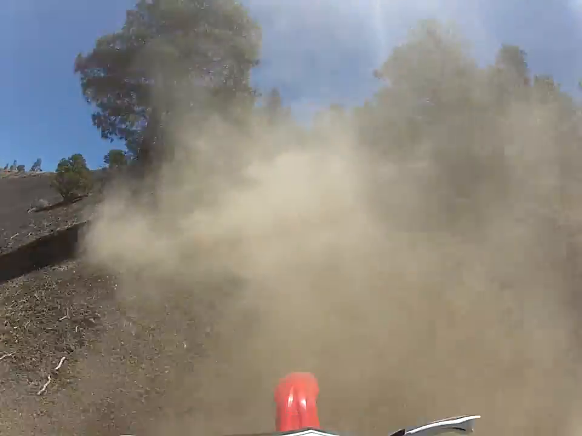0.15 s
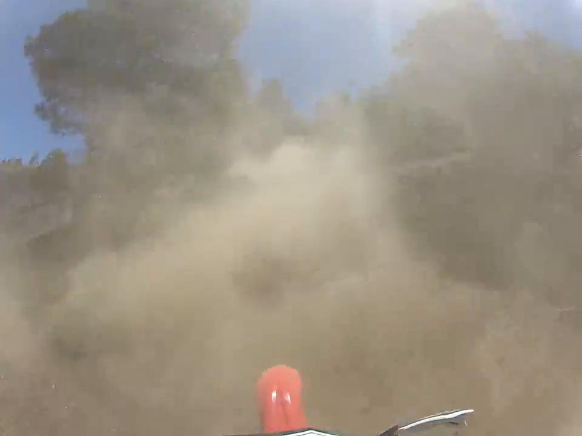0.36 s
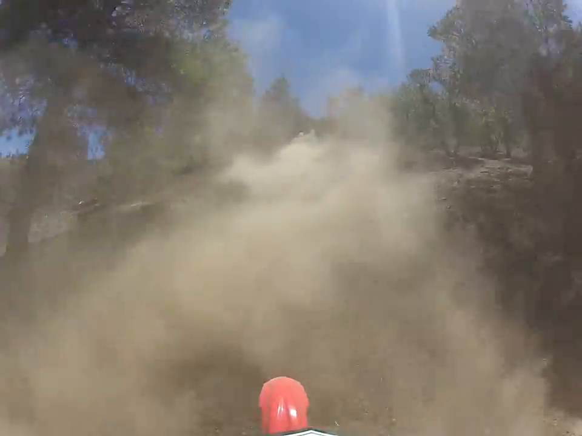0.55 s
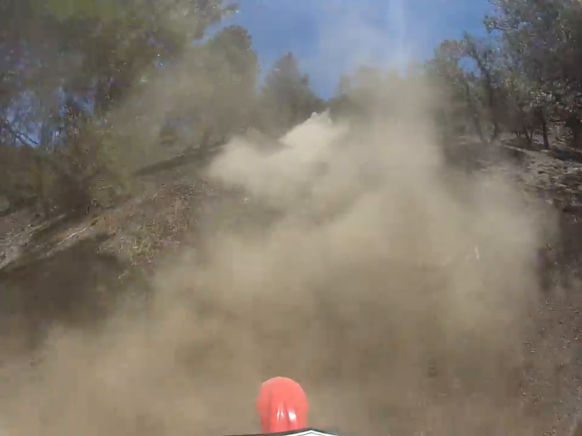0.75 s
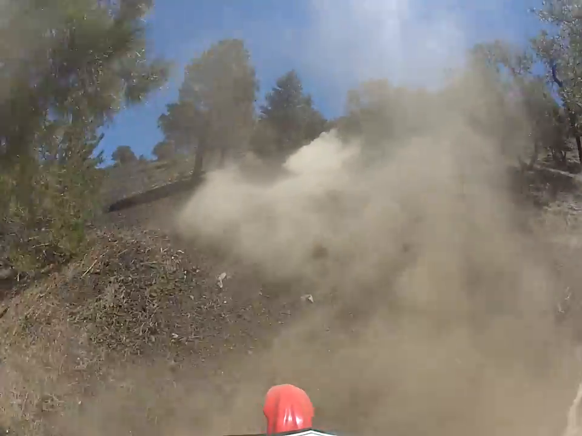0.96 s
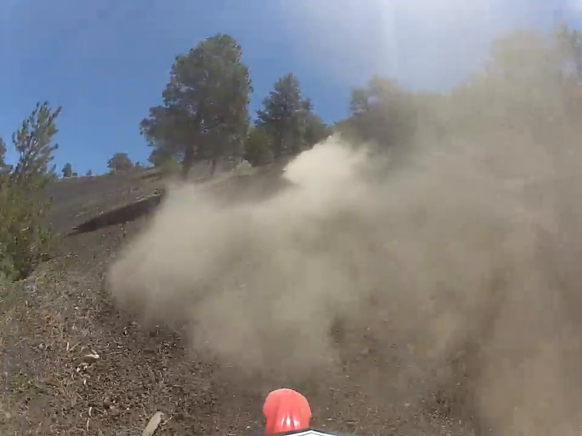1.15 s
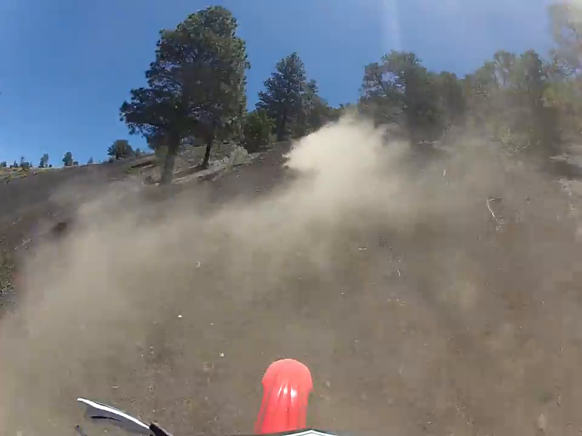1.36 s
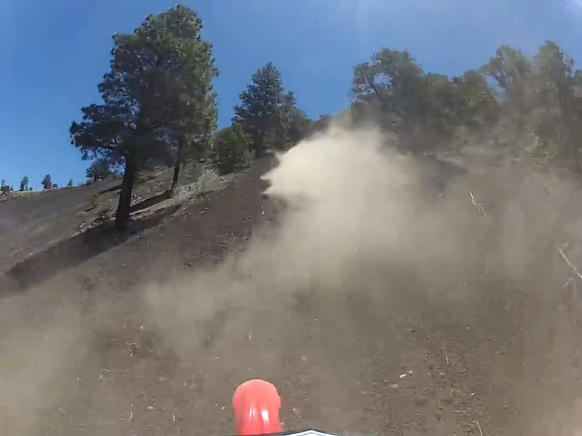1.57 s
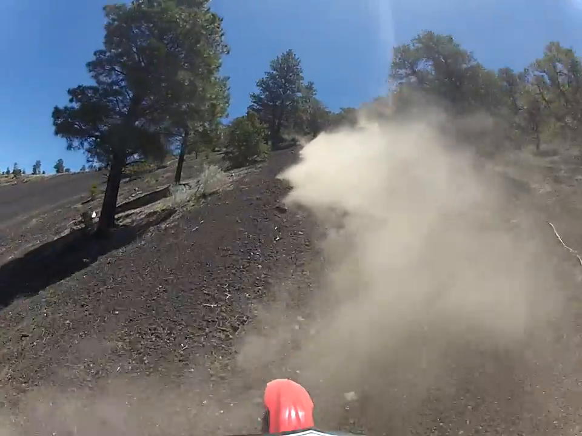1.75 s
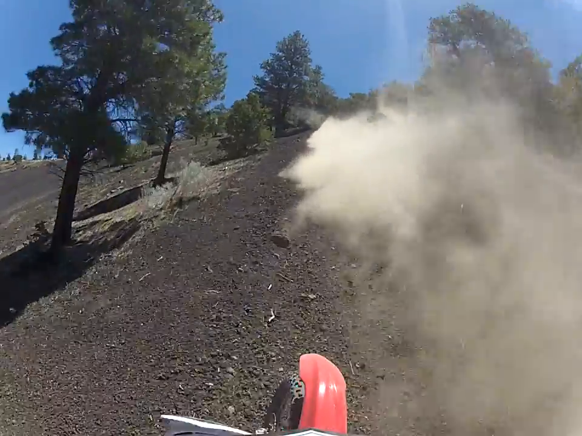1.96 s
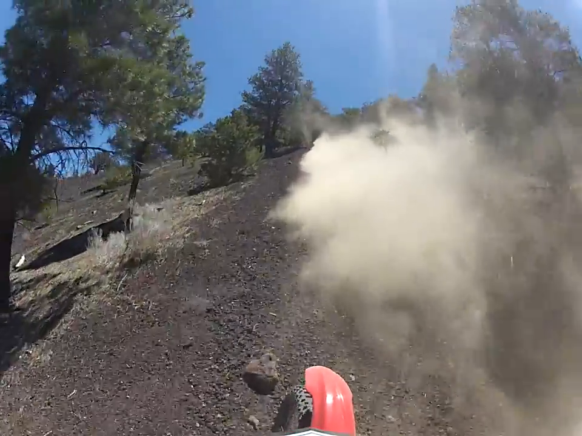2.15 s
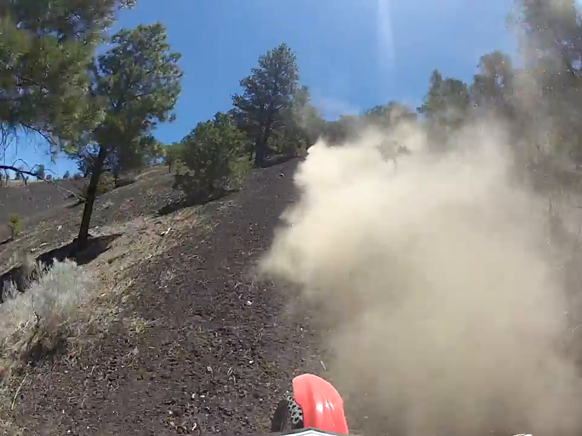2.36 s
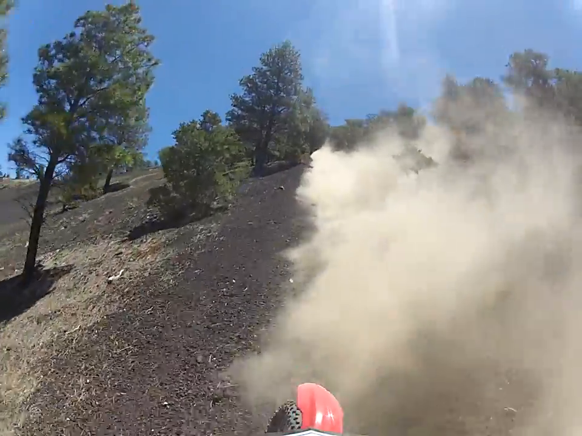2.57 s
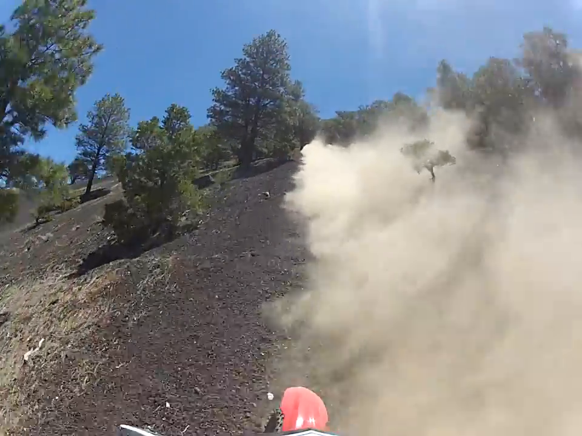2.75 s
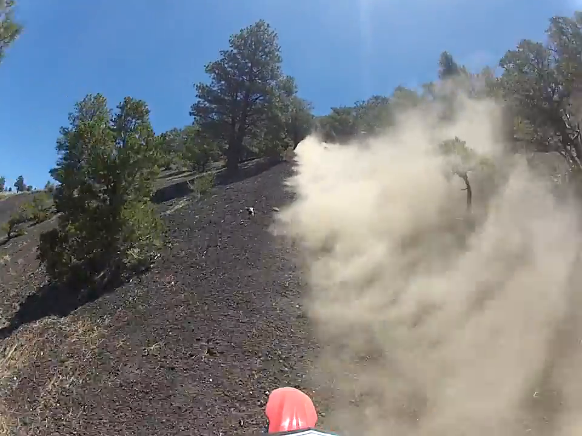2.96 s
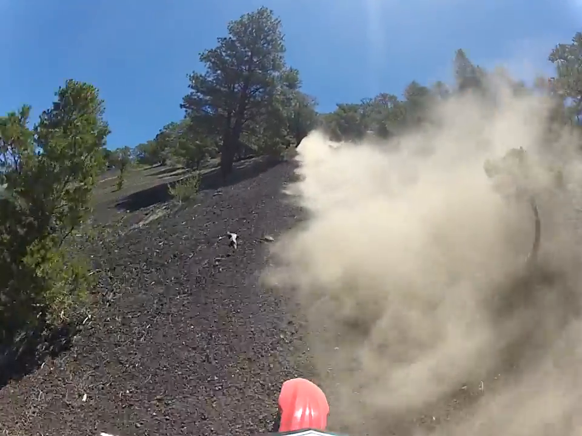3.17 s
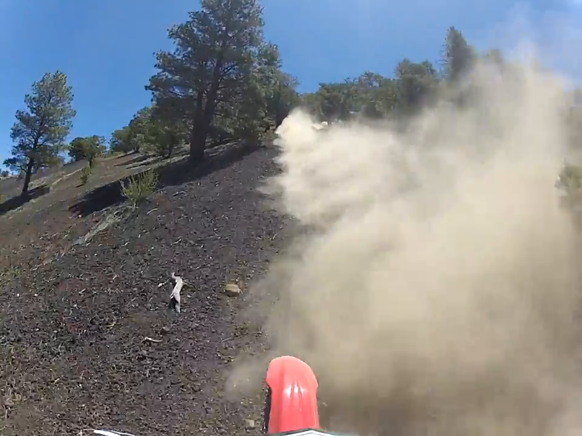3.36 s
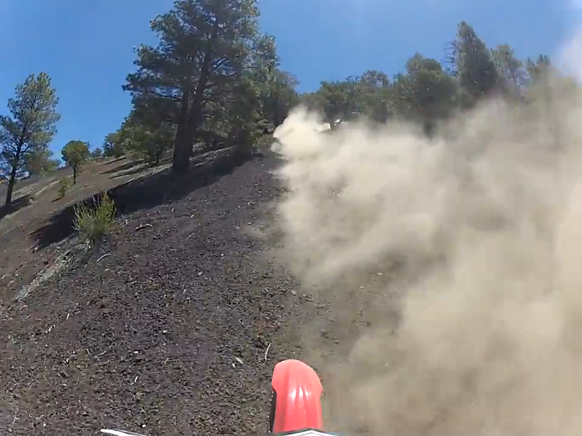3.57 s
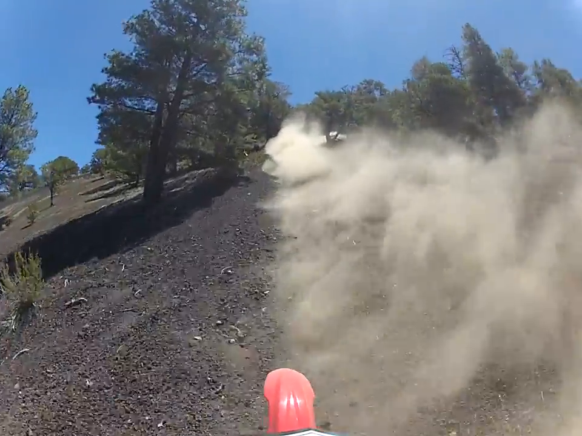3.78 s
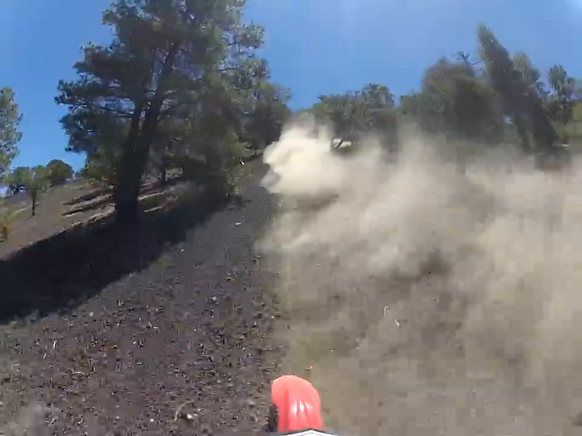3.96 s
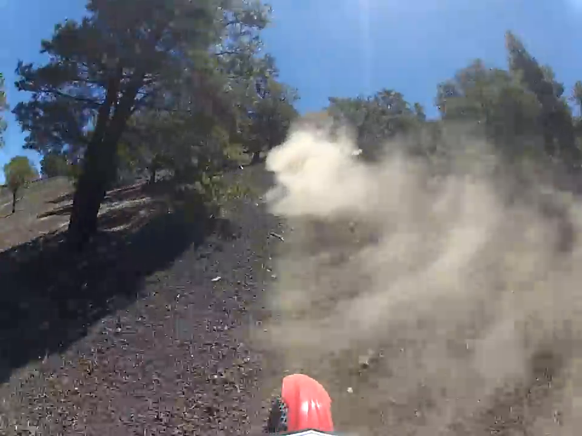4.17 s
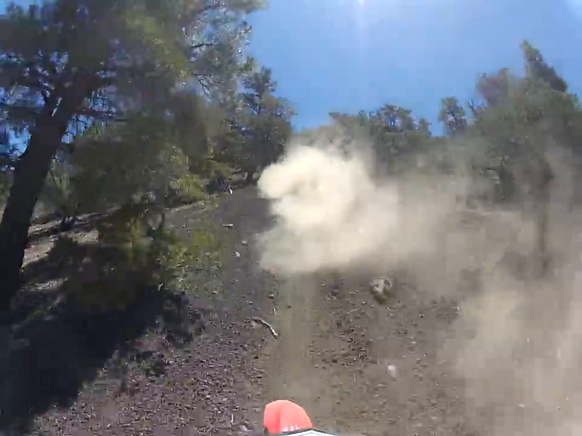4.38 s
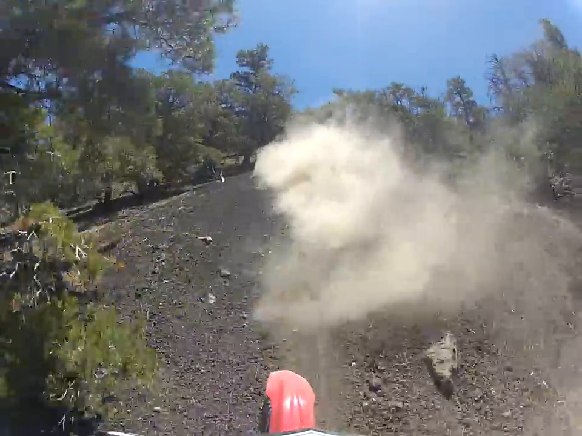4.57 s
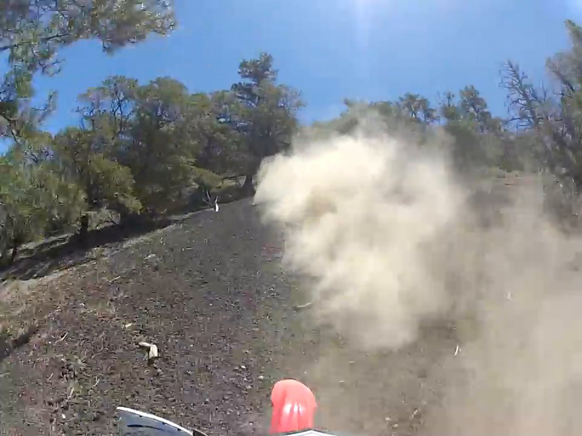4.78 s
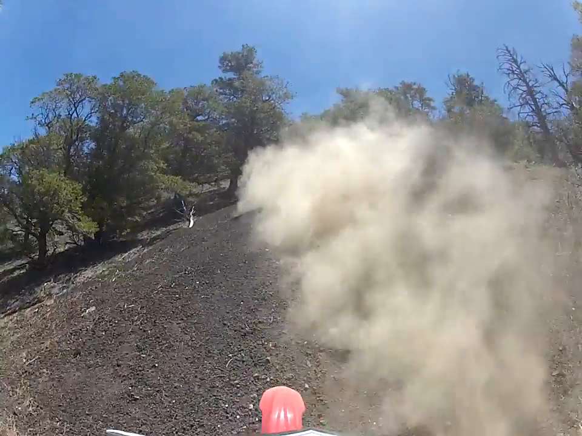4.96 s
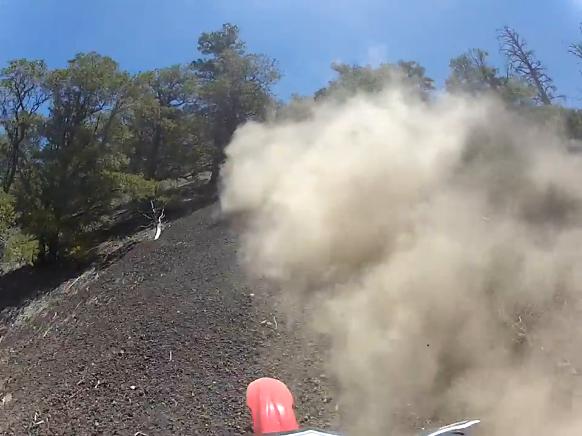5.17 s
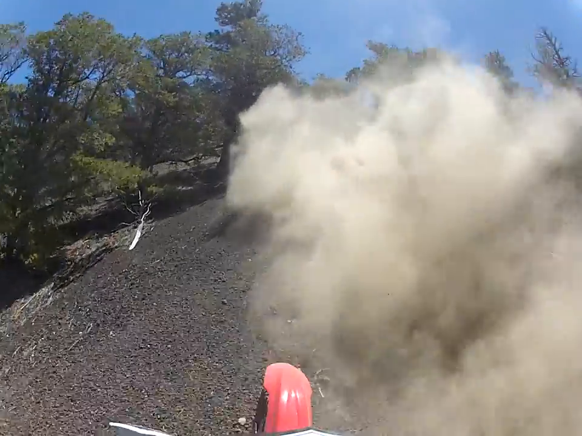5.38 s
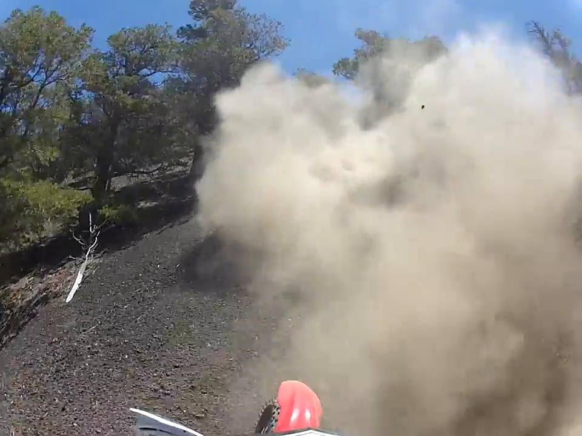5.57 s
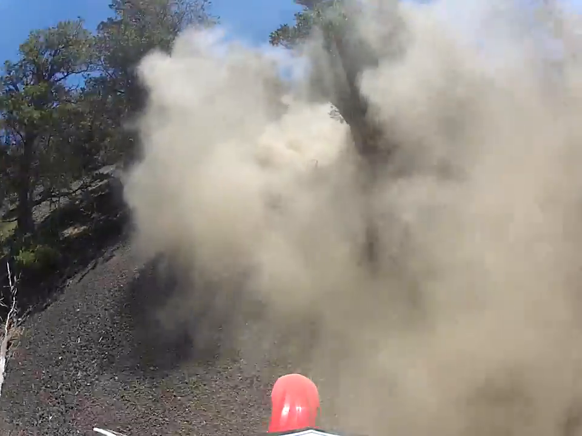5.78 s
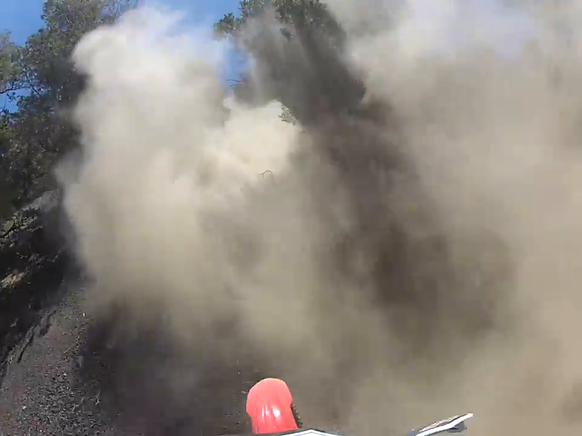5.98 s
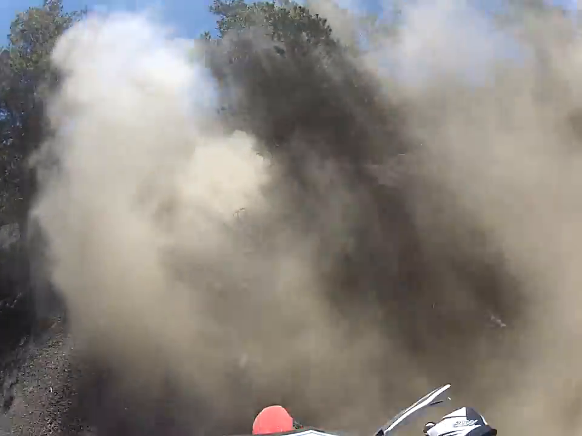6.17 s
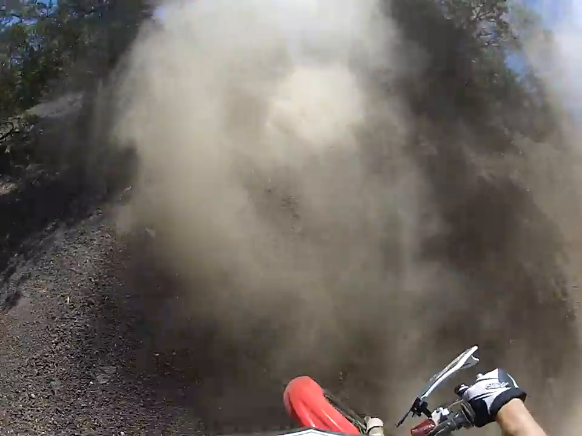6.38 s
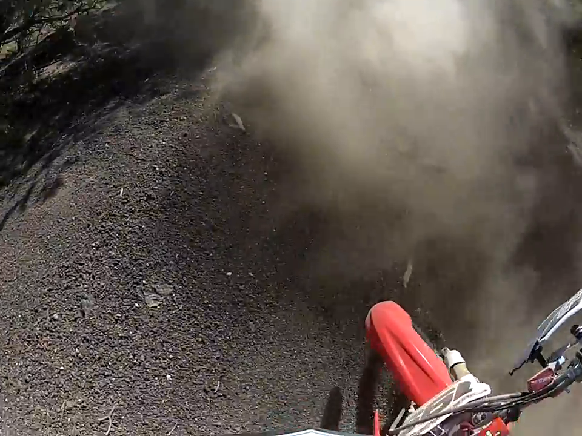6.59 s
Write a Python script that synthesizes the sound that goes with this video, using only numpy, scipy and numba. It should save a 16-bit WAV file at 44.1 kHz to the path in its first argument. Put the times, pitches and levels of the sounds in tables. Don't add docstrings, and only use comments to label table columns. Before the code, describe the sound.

A single-cylinder dirt bike roars steadily up a loose slope, crackling harshly, then shuts off, blips once and sags to faint idle with knocks.

```python
import sys
import numpy as np
from scipy import signal
from scipy.io import wavfile
from scipy.ndimage import uniform_filter1d
from numba import njit

SR = 44100
rng = np.random.default_rng(int(sys.argv[2]) if len(sys.argv) > 2 else 0)


def boost(x):
    u = np.asarray(x, float) / 20
    return 10 ** u


def digitize_waveform(pressure):
    field = np.atleast_2d(pressure).T
    bounded = np.clip(field, -1, 1)
    quanta = np.round(bounded * 32767).astype(np.int16)
    wavfile.write(sys.argv[1], SR, quanta)


N = 292383

# time_s, firing_rate_hz
FIRING_RATE = [(0, 54.635), (.26, 50.249), (.58, 58.422), (.96, 63.33), (1.4, 60.936), (1.68, 59.668),
               (1.8, 51.84), (2.5, 55.513), (2.95, 61.449), (3.5, 60.032), (4, 60.018), (4.52, 60.97),
               (4.76, 50.565), (4.8, 50.6), (5.038, 31.71), (5.698, 36.62), (6.05, 22.5), (6.63, 25)]
# time_s, level_db, load (0-1)
THROTTLE = [(0, -21, 0.78), (.38, -19.5, 0.77), (.63, -18.5, 0.35), (.7, -20, 0), (1.45, -19.5, 0.05),
            (1.66, -20.5, 0.26), (1.78, -23, 0.83), (2.1, -20.5, 0.75), (2.45, -20.5, 0.87),
            (2.83, -17, 0.57), (2.88, -20.5, 0), (4.45, -18.5, 0), (4.62, -20.5, 0.88), (5.19, -22.5, 0.6),
            (5.44, -31.5, 0.93), (5.8, -31, 0.35), (5.95, -35.5, 0), (6.63, -46.5, 0.4)]
# time_s, extra_db
BARKS = [(.353, 11.5), (.392, 6), (.518, 4.5), (.688, 11), (.788, 2), (.821, 9), (.918, 1.5), (1.093, 3),
         (1.188, 8.5), (1.481, 6), (1.582, 5), (1.615, 6.5), (1.734, 4.5), (2.843, 6), (2.877, 3),
         (2.943, 5), (3.072, 7), (3.171, 5), (3.352, 4.5), (3.635, 2), (3.986, 9.5), (4.019, 1.5),
         (4.282, 2.5), (4.399, 4.5), (5.099, 2.5), (5.181, 6), (5.419, 10), (5.756, 2), (5.785, 8),
         (5.847, 7)]
# mode_hz, width_hz, cruising_db, full_load_db, polarity (signed factor)
PIPE_MODES = [(99.5, 50, -29.5, -13, 1), (169, 48, -20, -21.5, -0.61), (222.2, 40.4, 8.5, 2, -0.81),
              (277, 44.6, -7.5, 1, 0.83), (312, 34.5, -17.5, -1.5, -1.09), (375, 160, -22.5, -66, 1),
              (457.8, 38.6, -7, -8, -0.9), (641, 76, -13, -20, 0.77), (740, 54, -17.5, -11, -0.76),
              (996, 50.3, -4.5, -7.5, 0.66), (1250, 76, -4.5, 0.5, -0.47)]
# mode_hz, width_hz, level_db
COOL_PIPE_MODES = [(71, 20, -10.5), (149, 25, -2.5), (178, 25, 2), (208, 23, 1), (304, 60, -3),
                   (404, 40, -8.5), (505, 54, -15), (625, 85, -15.5)]
# mode_hz, width_hz, gas_crack_db, clatter_db
CASE_MODES = [(309, 194, -38, -11.5), (547, 320, -47, -11.5), (839, 270, -9, -4), (981, 190, -11, -3.5),
              (1245, 175, -5, -2.5), (1660, 223, -10, -9), (1924, 106, -4.5, 6), (2280, 251, -1.5, -7),
              (2431, 134, -15.5, 1), (2900, 200, -17, -14), (3460, 270, -12, -9), (4260, 5500, -20.5, -29),
              (5930, 500, -23.5, -68)]
# centre_hz, width_hz, spread (ratio)
FLARES = [(1980, 260, .33), (2400, 260, .33), (2900, 400, .6), (3900, 500, .75), (4650, 500, .75)]
# order (multiple of the firing rate), level_db
SHAKE_ORDERS = [(1, -13), (2, -15.5), (3, -5.5), (4, 7.5), (5, -5), (6, -1), (8, -5.5)]
# start_s, length_s, depth_db
LIFTS = [
    (0.093, 0.21, -2),
    (1.698, 0.17, -2),
    (4.884, 0.218, -12.5),
    (5.193, 2, -8.5),
]
# time_s, over_steady_wind_db
GUSTS = [(0, 5), (.55, 7.5), (1.7, 6), (2.2, -11), (2.47, 7), (2.79, 1), (3.55, 3), (4.51, 5), (4.95, 7.5),
         (5.2, 7), (5.47, 3), (5.74, -5), (5.87, 5)]
# start_s, peak_db, ring_hz, tick_over_ring_db
KNOCKS = [(5.421, -41, 3400, -4), (5.598, -45, 5100, -8), (5.884, -41, 3600, 2), (5.917, -41, 4000, -2),
          (6.16, -34, 54, -26), (6.213, -29, 40, -16), (6.27, -31, 40, -24), (6.393, -34.5, 1250, -5.5),
          (6.425, -25.5, 80, -23), (6.43, -34, 510, -20), (6.45, -47, 450, -17), (6.47, -25.5, 35, -25),
          (6.576, -35, 350, -4), (6.616, -33.5, 150, -4)]

FIRST_PHASE = .57
CAMERA_RATE_HZ = 12000


def curve(table):
    s, *columns = np.transpose(table)
    return [np.interp(np.arange(N) / SR, s, c) for c in columns]


def unit(x):
    return x / np.sqrt(np.mean(x ** 2))


def ring(x, hz, width_hz):
    return signal.lfilter(*signal.iirpeak(hz, hz / width_hz, fs=SR), x)


def walk(rate_hz):
    hold = int(SR / rate_hz)
    levels = rng.standard_normal(N // hold + 1)
    return unit(uniform_filter1d(np.repeat(levels, hold)[:N], hold))


def revs():
    blip_s, rise_s, fall_s, blip_hz = 5.132, .112, .219, 17.06
    t = np.arange(N) / SR - blip_s
    blip = np.clip(np.minimum(1 + t / rise_s, 1 - t / fall_s), 0, 1)
    return curve(FIRING_RATE)[0] + blip_hz * blip


def cycles():
    return FIRST_PHASE + np.cumsum(revs()) / SR


def lift():
    t, edge_s = np.arange(N) / SR, .02
    total_db = 0
    for start_s, length_s, depth_db in LIFTS:
        total_db += depth_db * np.clip(np.minimum(t - start_s, start_s + length_s - t) / edge_s, 0, 1)
    return total_db


def firings():
    cycle = np.floor(cycles()).astype(int)
    start = np.r_[0, np.flatnonzero(np.diff(cycle)) + 1] / SR
    strength_chance, timing_chance = rng.standard_normal((len(start), 2)).T
    strength_db = 1.2 * strength_chance
    for s, extra_db in BARKS:
        strength_db[np.argmin(abs(start - s))] = extra_db
    late_s = 0.00027 * timing_chance
    return cycle, np.arange(N) / SR - (start + late_s)[cycle], strength_db


def pipe(load):
    scatter_db = .7 + .2 * np.maximum(50 - revs(), 0)
    lead = 0.249
    angle = (cycles() + lead + .5) % 1 - .5
    pulses = np.exp(-(angle / 0.0085) ** 2) * boost(scatter_db * walk(70))
    cooling_s = .25
    cool = np.clip((np.arange(N) / SR - LIFTS[-1][0]) / cooling_s, 0, 1)
    hot_pulses, cool_pulses = (1 - cool) * pulses, cool * pulses
    total = np.zeros(N)
    for hz, width_hz, cruising_db, full_load_db, polarity in PIPE_MODES:
        mode = ring(ring(hot_pulses, hz, 3 * width_hz), hz, width_hz)
        total += polarity * boost(cruising_db + load * (full_load_db - cruising_db)) * mode
    for k, (hz, width_hz, db) in enumerate(COOL_PIPE_MODES):
        mode = ring(ring(cool_pulses, hz, 3 * width_hz), hz, width_hz)
        total += (-1) ** k * boost(db) * mode
    return unit(total)


def turbulence():
    return boost(2 * walk(40)) * unit(ring(rng.standard_normal(N), 268, 120))


def case(gas, clatter):
    total = 0
    for k, (hz, width_hz, gas_db, clatter_db) in enumerate(CASE_MODES):
        drive = boost(gas_db) * gas + boost(clatter_db) * clatter
        total = total + (-1) ** k * ring(ring(drive, hz, 4 * width_hz), hz, width_hz)
    return unit(total)


def crack(cycle, since, strength_db, clatter_db):
    t = np.maximum(since + 0.0011, 0)
    size = boost(strength_db[cycle])
    snap_t = since - .0006
    snap = np.sinc(snap_t * CAMERA_RATE_HZ) * np.exp(-(snap_t / 0.00037) ** 2)
    burst = (t / 0.0042) ** 2 * np.exp(-t / 0.0014)
    echo = 0.15 * np.exp(-((t - .0075) / 0.00014) ** 2)
    tail = 0.48 * np.exp(-t / 0.0078) * (t > 0)
    rush = unit(burst * size + echo + tail) * rng.standard_normal(N)
    snap_share = .4
    gas = np.sqrt(snap_share) * unit(ring(snap * size, 2203, 1040)) + np.sqrt(1 - snap_share) * rush
    chances = rng.standard_normal((cycle[-1] + 1, len(FLARES))).T
    flared = gas
    for chance, (hz, width_hz, spread) in zip(chances, FLARES):
        flared = flared + ring(spread * chance[cycle] * gas, hz, width_hz)
    clatter = boost(clatter_db + 2.0 * walk(60)) * rng.standard_normal(N)
    return case(unit(flared), clatter)


def shake():
    angle = 2 * np.pi * cycles()
    wander_db, wander_rad, spread_rad = 1.4, .15, -2.4
    hum = np.zeros(N)
    for k, db in SHAKE_ORDERS:
        level = boost(db + wander_db * walk(25))
        phase = k * angle + wander_rad * walk(30) - 1.03 * k + spread_rad * (k - 4) ** 2
        hum += level * np.sin(phase)
    return unit(hum + 2.6 * ring(hum, 170, 160))


def wind():
    deep, mid, side = rng.standard_normal((3, N))
    t, gust_s = np.arange(N) / SR, 0.065
    swell_db = sum(db * np.exp(-((t - s) / gust_s) ** 2) for s, db in GUSTS)
    gust = boost(-39 + swell_db - 2.0 + 0.51 * walk(9.5))
    buffet = boost(-9 + 2.5 * walk(3)) * unit(ring(deep, 37, 48))
    rumble = unit(ring(ring(mid, 84, 166), 72, 100)) + buffet
    unlike = boost(-10) * unit(ring(ring(side, 29, 41), 28, 27))
    return unit(rumble) * gust, unlike * gust


def knocks():
    thud, tick = np.zeros(N), np.zeros(N)
    for s, peak_db, hz, tick_db in KNOCKS:
        t = np.maximum(np.arange(N) / SR - s, 0)
        thud += boost(peak_db) * np.sin(2 * np.pi * hz * t) * np.exp(-t / (.005 + .65 / hz))
        tick += boost(peak_db + tick_db) * (t > 0) * np.exp(-t / 0.0089)
    return thud + tick * case(0, rng.standard_normal(N))


def burble():
    start_s, length_s, edge_s, height_db = 5.46, 0.29, 0.047, 4
    t = np.arange(N) / SR - start_s
    return height_db * np.clip(np.minimum(t, length_s - t) / edge_s, 0, 1)


def scene():
    level_db, load = curve(THROTTLE)
    lift_db, burble_db = lift(), burble()
    change_db = level_db - level_db.max()
    exhaust_db = burble_db + level_db + 6 * load + 1.15 * lift_db - 1.5
    crack_db = level_db - 1.5 * load + 1.328 * lift_db - burble_db
    clatter_db = -24.5 + 0.55 * change_db + 1 * load + 0.64 * lift_db
    shake_db = -26 + 0.59 * change_db - 7.5 * load * boost(lift_db) + .7 * lift_db
    cycle, since, strength_db = firings()
    exhaust = boost(exhaust_db) * (pipe(np.clip(load, 0, 1)) + boost(-17) * turbulence())
    cracks = boost(crack_db + 4.0) * crack(cycle, since, strength_db, clatter_db - crack_db)
    engine = exhaust + boost(shake_db) * shake() + cracks
    mid, side = wind()
    mono = engine + mid + knocks()
    return np.array([mono + side, mono - side])


@njit
def limiter(x, top, ratio, release):
    y, e = np.empty(len(x)), 0.
    for i in range(len(x)):
        e = max(abs(x[i]), e * release)
        y[i] = min(1., (top / (e + 1e-9)) ** (1 - 1 / ratio))
    return y


def converter(x):
    hold, top_hz = 4, 15900
    slow = signal.resample_poly(x, CAMERA_RATE_HZ, SR, axis=1)
    steps = np.repeat(slow, hold, axis=1)
    held = signal.resample_poly(steps, SR, hold * CAMERA_RATE_HZ, axis=1)[:, :N]
    held = np.pad(held, ((0, 0), (0, N - held.shape[1])))
    return signal.sosfiltfilt(signal.butter(14, top_hz, fs=SR, output="sos"), held)


def roll_off(x):
    return signal.sosfilt(signal.butter(12, 16640, fs=SR, output="sos"), x)


def record(dry):
    release_s = .08
    gain = limiter(dry.mean(axis=0), 0.76, 4.1, np.exp(-1 / (release_s * SR)))
    limited = dry * uniform_filter1d(gain, 60)
    limited = limited / (1 + (limited / .9) ** 4) ** .25
    return roll_off(converter(limited))


dry = scene()
out = record(dry)
digitize_waveform(out)
```